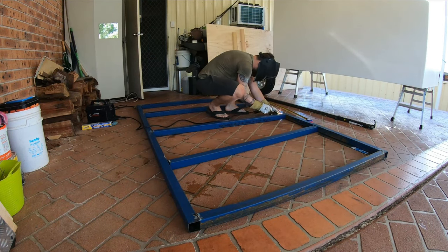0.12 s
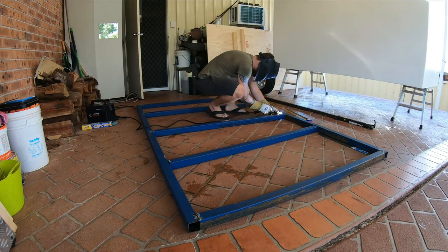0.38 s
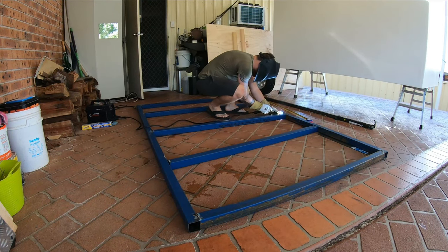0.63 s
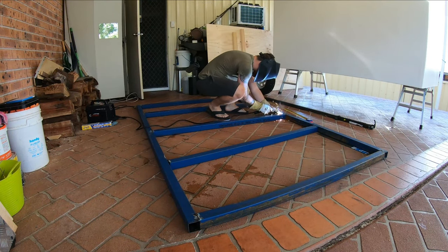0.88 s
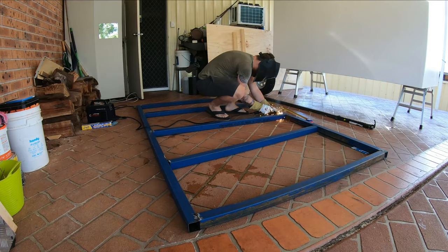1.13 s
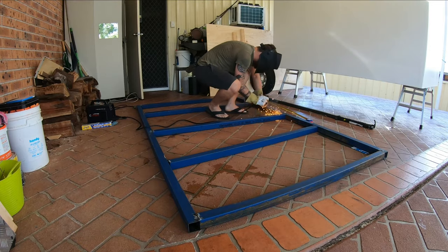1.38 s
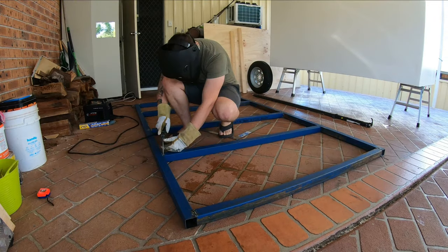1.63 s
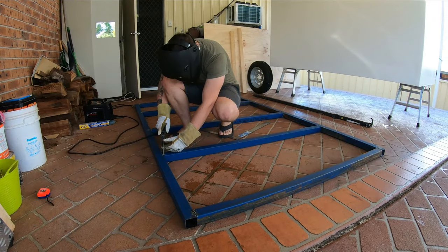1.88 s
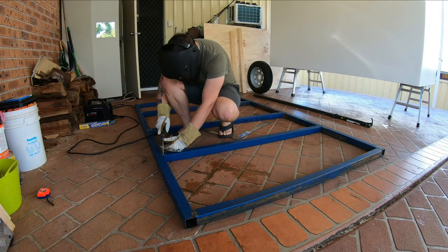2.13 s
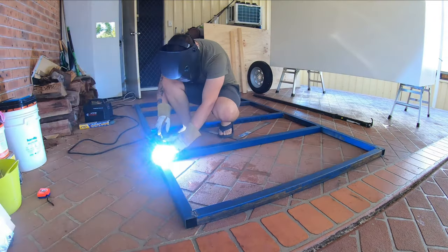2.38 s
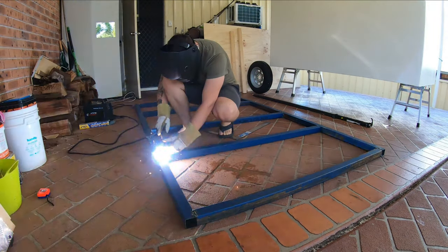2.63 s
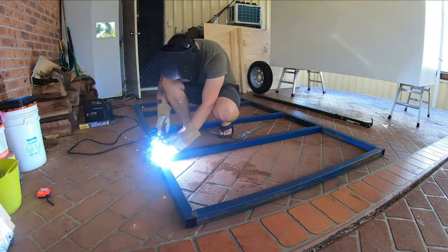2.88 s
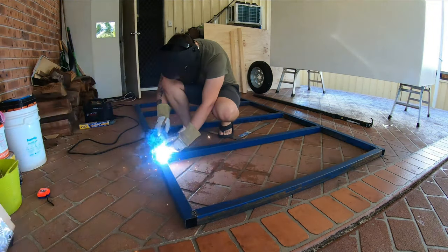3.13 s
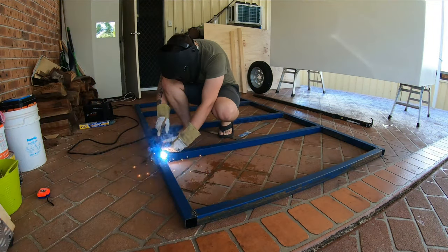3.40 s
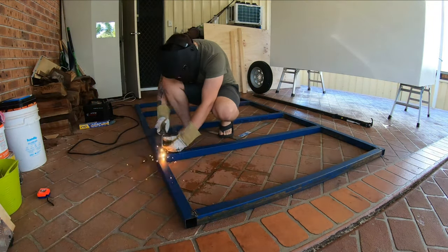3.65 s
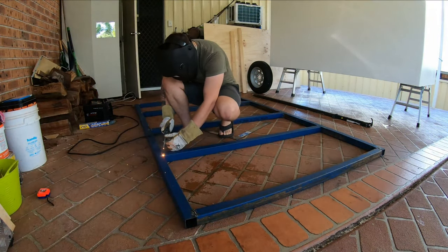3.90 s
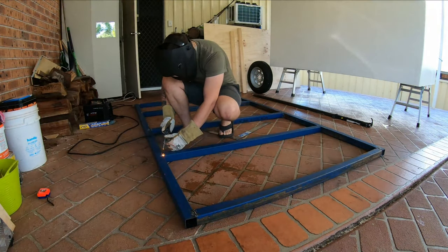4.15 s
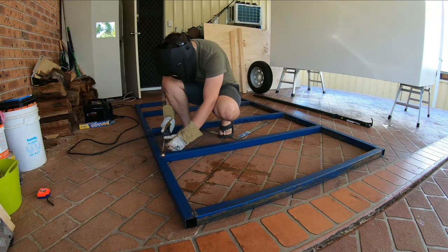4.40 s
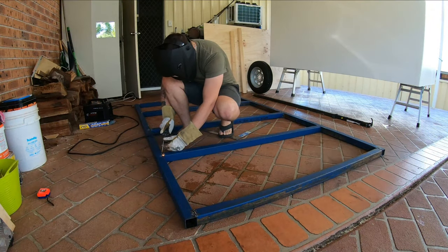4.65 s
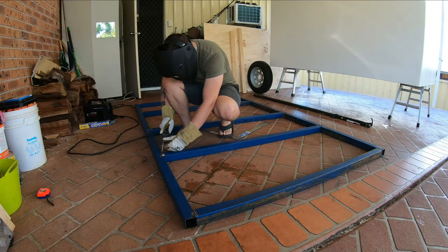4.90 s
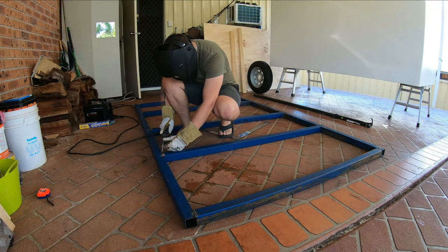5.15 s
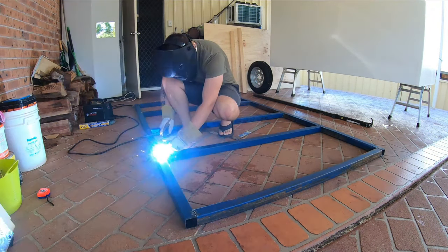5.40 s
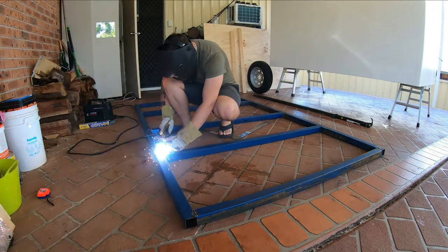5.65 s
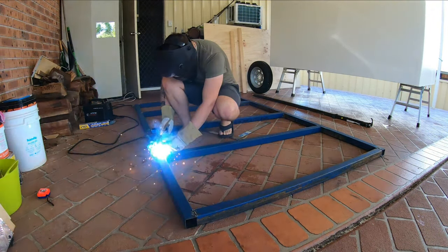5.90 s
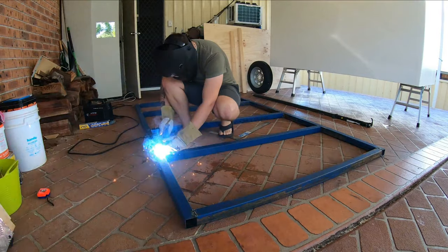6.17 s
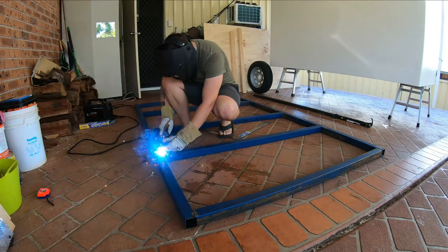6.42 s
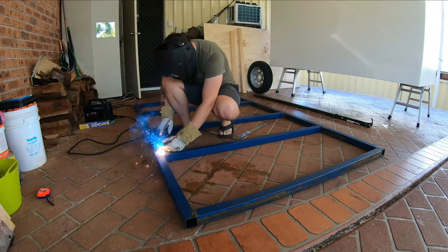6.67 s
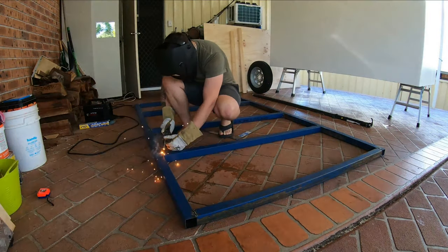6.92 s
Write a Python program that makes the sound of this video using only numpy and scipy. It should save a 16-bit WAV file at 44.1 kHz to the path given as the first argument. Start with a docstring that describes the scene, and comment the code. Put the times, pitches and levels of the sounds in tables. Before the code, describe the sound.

Harsh welding sizzle with spitting pops comes farther off, then twice close by, between pauses filled only by a fan's whirring mid-pitched hum.

```python
"""Under a carport, a stick welder joins steel tube: first at a far joint, then, after a jump in time,
twice at a near one. Random spark pulses make the sizzle, larger ones the pops; the two near runs
strike with a thud, low puffs of noise join in, and floor, walls and a tail answer.
The machine's seven-bladed fan hums throughout as tones over rushing noise; low noise stirs at the
microphone, with a thin hiss, a faint click at the jump, rustles and a bump."""
import sys
import numpy as np
from scipy import signal
from scipy.fft import rfft, irfft, next_fast_len
from scipy.io import wavfile
from scipy.ndimage import map_coordinates

SR = 44100
rng = np.random.default_rng(int(sys.argv[2]) if len(sys.argv) > 2 else 0)


def unload_audio(sound):
    """Save the sound as a 16-bit wav file, at the path given as the first command line argument."""
    columns = np.transpose(np.atleast_2d(sound))
    # keep every value between -1 and 1, then stretch to whole-number steps
    steps = np.round(np.clip(columns, -1, 1) * 32767)
    wavfile.write(sys.argv[1], SR, steps.astype(np.int16))


def gain_from_decibels(decibels):
    """Convert decibel values to linear amplitude factors."""
    exponent = np.asarray(decibels, float) / 20
    return 10 ** exponent


N = 310464
JUMP = 1.64  # s, from the far joint to the near one

# The burning arc, before its flares and the floor's colour. Each row: lit in seconds, broken in seconds,
# sizzle at first in dB, sizzle at last in dB, flare as it breaks in dB.
RUNS = [(0, 1.327, -44.5, -41.5, 5.5), (2.432, 3.765, -40, -43, 9.5), (5.377, 6.894, -40, -46, 18)]


def unit(x):
    """Brought to rms 1."""
    return x / np.sqrt(np.mean(x ** 2) + 1e-20)


def along(points, hz):
    """Reads (Hz, value) points on a log frequency axis."""
    point_hz, value = np.transpose(points)
    return np.interp(np.log(hz + 1), np.log(point_hz + 1), value)


def curves(rows):
    """One value per sample for each column after the time."""
    s, *columns = np.transpose(rows)
    return [np.interp(np.arange(N) / SR, s, column) for column in columns]


def wobble(rate):
    """A smooth random curve, rate knots a second."""
    knots = rng.standard_normal(int(N * rate / SR) + 4)
    return map_coordinates(knots, [np.arange(N) * rate / SR])


def filtered(x, response):
    """x times a complex response of frequency."""
    m = next_fast_len(N + SR // 2)
    return irfft(rfft(x, m) * response(np.fft.rfftfreq(m, 1 / SR)), m)[..., :N]


def pulse(gain, size=2048):
    """The shortest causal (minimum-phase) pulse of a given colour, peak 1."""
    cepstrum = irfft(np.log(gain(np.fft.rfftfreq(size, 1 / SR)) + 1e-6))
    # folding the cepstrum forward in time makes the pulse causal
    cepstrum[1:size // 2] *= 2
    cepstrum[size // 2 + 1:] = 0
    p = irfft(np.exp(rfft(cepstrum)))
    return p / np.abs(p).max()


def diffuse(pair, alike):
    """Two unrelated signals mixed to a left-right likeness at each frequency."""
    turn = lambda hz: np.arccos(np.clip(along(alike, hz), -1, 1)) / 2
    mid, side = filtered(pair, lambda hz: [np.cos(turn(hz)), np.sin(turn(hz))])
    return np.array([mid + side, mid - side])


def bump(s, rise, fall):
    """Grows exponentially to 1 at s, then dies away."""
    t = np.arange(N) / SR - s
    return np.exp(np.where(t < 0, t / rise, -t / fall))


def peak_shape(hz, centre_hz, width_hz):
    """A resonance curve, 1 at its centre."""
    return width_hz ** 2 / (width_hz ** 2 + 4 * (hz - centre_hz) ** 2)


def swells(rows, octaves):
    """Short swells of band noise, rows of (s, dB, half width s, Hz)."""
    t, out = np.arange(N) / SR, np.zeros(N)
    for s, db, width, centre_hz in rows:
        band_gain = lambda hz: np.exp(-(np.log2((hz + 1) / centre_hz) / octaves) ** 2)
        band = filtered(rng.standard_normal(N), band_gain)
        out += gain_from_decibels(db) * np.exp(-((t - s) / width) ** 2) * unit(band)
    return out


def draught():
    """Air at the microphone: a lumpy rumble, partly each port's own, swelling in gusts."""
    # Each row: peak in seconds, level in dB, half width in seconds.
    gust_rows = [(2.43, -65, 0.027), (2.78, -72, .04), (3.02, -75, 0.027), (3.78, -62, .04),
                 (5.39, -53, .05), (5.76, -60, 0.041), (6.21, -53, .03), (6.57, -56.5, 0.087),
                 (6.92, -77, .04)]
    t = np.arange(N) / SR
    noise = rng.standard_normal(N) + 0.71 * rng.standard_normal((2, N))
    rumble_colour = [(12, -39), (30, -9.0), (60, 0.0), (90, -13.0), (200, -57)]  # Hz, dB
    rumble = filtered(noise, lambda hz: gain_from_decibels(along(rumble_colour, hz)))
    gusts = sum(gain_from_decibels(db) * np.exp(-((t - s) / width) ** 2) for s, db, width in gust_rows)
    still_db = np.where(t < JUMP, -75, -82)
    return (gain_from_decibels(still_db + 2.5 * wobble(7.4)) + gusts) * unit(rumble)


def hiss():
    """A thin hiss high in the treble, each port its own; its level follows a short curve."""
    # Each row: time in seconds, level in dB.
    hiss_level = [(0, -80), (1.5, -74), (2.4, -77), (4.05, -78), (4.15, -99), (7.04, -93)]
    treble = lambda hz: np.exp(-(np.log2((hz + 1) / 9500) / 0.41) ** 2)
    return gain_from_decibels(curves(hiss_level)[0]) * unit(filtered(rng.standard_normal((2, N)), treble))


def click_and_rustles():
    """A faint click at the jump in time, then rustles and a bump, as short swells of band noise."""
    # Each row: peak in seconds, level in dB, half width in seconds, centre in Hz.
    rustle_rows = [(1.639, -64, 0.00091, 12000), (2.097, -63, .006, 7800), (2.16, -56.5, 0.05, 3104),
                   (4.52, -60, 0.012, 90)]
    return swells(rustle_rows, octaves=.6)


def fan():
    """The blade tone and weak shaft orders waver over the rush of air through the case."""
    # Each row: time in seconds, blade pitch in Hz, blade tone in dB.
    blade_course = [(0, 453.3, -45.5), (1, 455.7, -48.5), (1.62, 454.5, -44), (1.66, 461.3, -48.5),
                    (2.3, 464.4, -51.5), (3, 459.3, -50.5), (4.2, 455.5, -47.5), (4.5, 456.7, -51),
                    (5.29, 455.4, -44), (6.2, 458.8, -49), (7.04, 453.4, -45)]
    # Each row: order of the shaft's turning rate, level in dB.
    shaft_orders = [(5, -61), (8, -57), (12, -67), (14, -66), (20, -65), (24, -74), (28, -74), (35, -77),
                    (46, -73)]
    # The rush of air ahead of the case. Each row: frequency in Hz, relative dB per Hz.
    air_colour = [(35, -69), (60, -51), (269, -15.5), (302, -10.5), (381, -13), (458, -5), (491, -14.5),
                  (526, -12), (679, -13.5), (916, -15.5), (1130, -19.5), (1270, -18.5), (2910, -26),
                  (7680, -37), (15000, -73)]
    # The machine's case. Each row: resonance in Hz, width in Hz, its share in dB relative to the plain air.
    case_peaks = [(311, 57, -2.5), (163.5, 39, 12.5), (940, 31, 0)]
    # Each row: time in seconds, level of the air in dB.
    air_level = [(0, -48.5), (1.63, -47.5), (1.65, -46), (3.5, -47), (5, -47.5), (7.04, -46.5)]
    # Diffuse air at the two ports. Each row: frequency in Hz, left-right likeness from 0 to 1.
    air_likeness = [(60, 0.27), (130, 0.78), (290, 0.99), (640, 0.33), (1410, 0.16), (3100, 0.8),
                    (6820, 0.11), (15000, 0.065)]
    blades = 7
    blade_hz, blade_db = curves(blade_course)
    turn = 2 * np.pi * np.cumsum(blade_hz * (1 + 0.001184 * wobble(12))) / SR / blades  # shaft, radians
    blade = gain_from_decibels(blade_db + 1.55 * wobble(25) + 0.9 * wobble(7)) * np.sin(blades * turn)
    orders = sum(gain_from_decibels(db + 3.0 * wobble(6)) * np.sin(order * turn + 0.7 * wobble(9.8))
                 for order, db in shaft_orders)
    tone = np.sqrt(2) * (blade + orders) * gain_from_decibels([[.3], [-.3]])  # a shade to the left
    case = lambda hz: 1 + sum(gain_from_decibels(db) * peak_shape(hz, centre, width) for centre, width, db in case_peaks)
    air = filtered(rng.standard_normal((2, N)), lambda hz: gain_from_decibels(along(air_colour, hz)) * case(hz))
    air_db = curves(air_level)[0] + .8 * wobble(6)
    return tone + gain_from_decibels(air_db) * unit(diffuse(air, air_likeness))


def puffs():
    """The arc stretches and gutters with low puffs, as swells of band noise."""
    # Each row: peak in seconds, level in dB, half width in seconds, centre in Hz.
    puff_rows = [(1.335, -50.5, 0.025, 167), (2.45, -38, 0.025, 170), (2.77, -61, 0.015, 120),
                 (3.03, -50, 0.0095, 143), (3.78, -37, 0.013, 155), (5.4, -37, 0.022, 168),
                 (5.52, -51, 0.085, 178), (6.906, -36, 0.029, 193), (6.92, -42, 0.022, 100)]
    return swells(puff_rows, octaves=0.52)


def strikes():
    """Cold air flashes to plasma: one big dull pulse as each near run lights."""
    # Each row: start in seconds, peak in dB.
    strike_rows = [(2.429, -4), (5.3774, -4)]
    # Colour of the thud. Each row: frequency in Hz, relative dB per Hz.
    thud_colour = [(47, -31), (80, -12.5), (405, 1.5), (1420, 1.5), (1760, 1.5), (2590, -30), (3290, -10),
                   (4080, -5), (6030, -16.5), (8160, -23), (10300, -19), (12000, -47), (14000, -40)]
    s, db = np.transpose(strike_rows)
    blows = np.bincount(np.round(s * SR).astype(int), -gain_from_decibels(db), N)
    return signal.oaconvolve(blows, pulse(lambda hz: gain_from_decibels(along(thud_colour, hz))))[:N]


def spark_parts():
    """A spark's pulse in three parts: body of the slow discharge, crack, and fizz of the fastest edge."""
    # Colour of a spark. Each row: frequency in Hz, relative dB per Hz.
    spark_colour = [(290, -22.5), (500, -9), (603, -5), (716, -10.5), (941, -7), (1170, -4), (1370, -5),
                    (1490, -4), (2040, -0.5), (2330, -5), (2970, -2), (6180, -3), (10500, -15),
                    (14000, -26), (15500, -21.5)]
    above = lambda hz, edge_hz: 1 / (1 + (edge_hz / (hz + 1)) ** 6)
    colour = lambda hz: gain_from_decibels(along(spark_colour, hz))
    body = pulse(lambda hz: colour(hz) * (1 - above(hz, 3050)))
    crack = pulse(lambda hz: colour(hz) * above(hz, 2930) * (1 - above(hz, 7840)))
    fizz = pulse(lambda hz: colour(hz) * above(hz, 6950))
    return body, crack, fizz


def small_pops(count=70):
    """Lesser pops scattered at random through each run, as rows like those of the loud ones."""
    # One row a run: pops per second, crack peak in dB.
    lesser_rates = [(25, -35.5), (25, -33), (28, -31.5)]
    body_db, fizz_db = -4.5, 6.5  # relative to the crack
    spread_db = [0, 2, 2]  # random spread of crack, body and fizz
    rows = []
    for (lit, broken, *_), (rate, crack_db) in zip(RUNS, lesser_rates):
        s = lit + np.cumsum(rng.exponential(size=count)) / rate
        levels = [crack_db, body_db, fizz_db] + rng.standard_normal((count, 3)) * spread_db
        rows += list(np.c_[s, levels][s < broken])
    return rows


def pops(delay=0.001185):
    """Molten drops short the arc and burst: single spark pulses, delay seconds after their listed times."""
    # The loudest sparks, before the floor's colour. Each row: time in seconds, crack peak in dB,
    # body in dB and fizz in dB, both relative to the crack.
    loud_pops = [(0.083, -34, -6, 6), (0.2389, -28, -8, 14), (0.408, -44, -6, 15), (0.4778, -23, -11, 2),
                 (0.6564, -30, 4.5, 2), (0.727, -39, -6, 16), (1.0076, -26, -5.5, 0),
                 (1.3127, -21, -6, -14), (2.7023, -14.5, -20, -4), (2.7125, -22, 6, 10),
                 (2.805, -11, -8, 0), (2.9755, -24, 1.5, 0), (3.0133, -16, -3.5, -1), (3.073, -20, -5, -2),
                 (3.2555, -24, -1, -15), (3.4614, -27, -9.5, 2), (3.5146, -32, 8, 4),
                 (3.5392, -15.5, -7.5, -3), (3.554, -21.5, 2, 0), (3.624, -30, 9, -5), (5.477, -20, -1, 1),
                 (5.4896, -22, -7, 1), (5.4996, -27, 2, -10), (5.7597, -23.5, 2.5, 3.5),
                 (5.7873, -17.5, -4.5, 0), (5.901, -24.5, 4, -5), (6.037, -27.5, -11, 10),
                 (6.0489, -23.5, 1.5, 8), (6.0758, -21, -12, 6), (6.1038, -22, -1, 8), (6.2845, -19, -7, 5),
                 (6.345, -21, -4, 5.5), (6.414, -21, -1.5, 0), (6.475, -28.5, -12, 8),
                 (6.5183, -28, -15, 1.5), (6.571, -21, -29, -12), (6.5979, -25.5, -10.5, 5),
                 (6.6096, -24, 0.5, 9.5), (6.6343, -18, -5.5, -2), (6.777, -16.5, -13, -3.5),
                 (6.8222, -18, -14, 3), (6.883, -26, 10, -10)]
    s, crack_db, body_db, fizz_db = np.transpose(loud_pops + small_pops())
    at = np.round((s + delay) * SR).astype(int)
    levels = (crack_db + body_db, crack_db, crack_db + fizz_db)
    return sum(signal.oaconvolve(np.bincount(at, -gain_from_decibels(level), N), part)[:N]
               for level, part in zip(levels, spark_parts()))


def burning():
    """Level and tilt of the arc in dB: a slow drift along each run, a strike, flares and a break."""
    # The arc flares as metal crosses it. Each row: peak in seconds, gain in dB, rise in seconds,
    # fall in seconds, tilt toward the body in dB.
    flare_rows = [(.045, 11, 0.043, 0.0078, 5.5), (0.124, 11.5, 0.012, 0.016, 3.5),
                  (.28, 10, 0.064, 0.013, 2), (.405, 7.5, .03, 0.0074, 1.5), (.48, 2, 0.0055, 0.013, -1),
                  (.58, 5.5, 0.016, 0.017, 1), (.658, 2, 0.0027, 0.023, 7), (.82, 0, .005, .04, 9),
                  (.94, 5, .02, 0.055, -1), (1.02, 1.5, 0.014, 0.45, 6), (2.704, 7.5, 0.0031, .05, -8),
                  (2.808, 6.5, 0.0061, 0.068, 0), (3.015, 5, 0.0045, 0.14, -2.5), (3.35, 1, .02, 0.056, -4),
                  (3.465, 5, 0.0046, 0.025, 0), (3.555, 2.5, 0.031, 0.01, -3),
                  (5.488, 12, 0.01, 0.056, 8.5), (5.692, 8, .005, 0.012, 1), (5.79, 9.5, 0.014, 0.032, -5),
                  (5.909, 7.5, 0.035, 0.014, 0.5), (6.05, 4, 0.041, 0.2, -7),
                  (6.212, 8.5, 0.012, 0.014, -4), (6.29, 9, 0.01, 0.024, -4),
                  (6.345, 8, 0.013, 0.021, -4.5), (6.42, 6, .005, 0.022, 0), (6.63, 11.5, 0.013, 0.031, -8),
                  (6.79, 5.5, 0.024, 0.033, -7), (6.84, 6, .02, 0.073, -3.5)]
    strike_db, strike_fall_s, strike_tilt_db = 7, .015, 10  # the fresh arc is loud and dull, then settles
    break_rise_s, break_tilt_db = 0.02, 5  # the stretched arc swells and dulls
    out_db_per_s = 454  # then dies
    t, level_db, tilt_db = np.arange(N) / SR, np.full(N, -200.), np.zeros(N)
    for lit, broken, first_db, last_db, break_db in RUNS:
        fresh = (lit > 0) * np.exp(-np.abs(t - lit) / strike_fall_s)  # the first run is already alight
        stretched = np.exp(np.minimum(t - broken, 0) / break_rise_s) * (t < broken + .1)
        drift_db = np.interp(t, [lit, broken], [first_db, last_db])
        dying_db = out_db_per_s * np.maximum(t - broken, 0)
        run_db = drift_db + strike_db * fresh + break_db * stretched - dying_db
        level_db = np.where(t >= lit, run_db, level_db)
        tilt_db += strike_tilt_db * fresh + break_tilt_db * stretched
    for s, db, rise, fall, lean_db in flare_rows:
        shape = bump(s, rise, fall)
        level_db += db * shape
        tilt_db += lean_db * shape
    return level_db, tilt_db


def sizzle(rate=2500, spread_db=4.5, own_db=3, flicker_db=1.2):
    """Dense random sparks, mostly tiny, a few large, each with its own colour; the arc flickers fast."""
    # How long the arc is drawn shifts its colour along each run, before the tilt of strikes, flares and
    # breaks. Each row: time in seconds, body in dB and fizz in dB, both relative to the crack.
    colour_drift = [(0, -2, 6.5), (1.336, -3, 4), (2.43, 1.5, -2.5), (3.766, -1.5, -2.5), (5.378, -3, 0.5),
                    (6.898, 2.5, -5.5)]
    size = np.minimum(rng.exponential(size=N), 3.2)
    sparks = -gain_from_decibels(spread_db * size) * (rng.random(N) < rate / SR)  # rate in sparks a second
    # each part of each spark has its own random level
    body, crack, fizz = (unit(signal.oaconvolve(sparks * gain_from_decibels(own_db * rng.standard_normal(N)), part)[:N])
                         for part in spark_parts())
    level_db, tilt_db = burning()
    body_db, fizz_db = curves(colour_drift)
    body_db = body_db + tilt_db
    fizz_db = fizz_db - 0.31 * tilt_db  # dB of fizz lost for each dB of tilt
    mix = crack + gain_from_decibels(body_db) * body + gain_from_decibels(fizz_db) * fizz
    mix = mix / np.sqrt(1 + gain_from_decibels(2 * body_db) + gain_from_decibels(2 * fizz_db))
    return mix * gain_from_decibels(level_db + flicker_db * wobble(40))


def floor_bounce(x):
    """Each run has its own colour, as bounces off the floor boost or cut bands."""
    # One table a run. Each row: centre of the band in Hz, width in Hz, boost or cut in dB.
    bounce_bands = [
        [(1224, 850, 8), (2900, 1800, 5), (3700, 420, 5), (4940, 300, 4.5), (5900, 500, -1.5),
         (11100, 550, 2.5)],
        [(2420, 800, 0.5), (4688, 1100, 3), (12000, 930, -3)],
        [(2150, 410, 1.5), (2820, 340, 5), (4600, 480, -2), (10400, 650, 3)],
    ]
    t, out = np.arange(N) / SR, np.zeros(N)
    for (lit, broken, *_), bands in zip(RUNS, bounce_bands):
        gain_db = lambda hz: sum(db * peak_shape(hz, centre, width) for centre, width, db in bands)
        colour = pulse(lambda hz: gain_from_decibels(gain_db(hz)))
        out += signal.oaconvolve(x * (t >= lit) * (t < broken + .1), colour)[:N]
    return out


def carport(x, walls, tail_db):
    """Direct sound reaches the ports out of step; single walls answer, then a tail dying band by band."""
    # The tail under the roof. Each row: frequency in Hz, time to fall 60 dB in seconds,
    # colour in dB added to tail_db, left-right likeness from 0 to 1.
    tail_bands = [(120, 0.5, -22.5, 0.93), (298, 0.088, 11, 1), (950, 0.37, -1.5, 0.27),
                  (3800, 0.31, -1, 0.67), (12000, 0.22, -2.5, 0)]
    # Direct sound at the two ports. Each row: frequency in Hz, radians by which the left leads.
    port_lead = [(150, 0), (400, -0.78), (1000, 0.84), (4000, -0.14), (6000, 0.88), (9000, 2.23),
                 (12000, 1.35)]
    side = np.array([[.5], [-.5]])
    direct = filtered(x, lambda hz: np.exp(1j * side * along(port_lead, hz)))
    # each echo's delay is scattered by a small random amount between the ports, one amount per wall
    echoes = lambda hz: sum(
        gain_from_decibels(db + side * pan_db) * np.exp(-2j * np.pi * hz * (s + side * rng.normal(0, 6e-5)))
        for s, db, pan_db in walls)
    band_hz, t60, colour_db, alike = np.transpose(tail_bands)
    by_band = lambda column: np.transpose([band_hz, column])
    hz, t, z = signal.stft(rng.standard_normal((2, SR // 2)), SR, nperseg=256)
    decay = gain_from_decibels(-60 * t / along(by_band(t60), hz)[:, None])
    tail = signal.istft(z * decay, SR, nperseg=256)[1]
    tail *= 1 - np.exp(-np.arange(tail.shape[1]) / (.006 * SR))  # the tail builds up
    wet = signal.fftconvolve(x[None], tail / np.linalg.norm(tail[0]), axes=1)[:, :N]
    wet = filtered(wet, lambda hz: gain_from_decibels(tail_db + along(by_band(colour_db), hz)))
    return direct + filtered(x, echoes) + diffuse(wet, by_band(alike))


def scene():
    """The same arc heard from two joints, over the fan."""
    # Echoes at each distance. Each row: delay in seconds, level in dB, left-right difference in dB.
    far_walls = [(.0014, -13.5, -19), (.0048, -18.5, -13), (.0075, -6.5, -4.5), (0.0107, -8, 7.5)]
    near_walls = [(.0009, -11, 0), (.002, -13, 0), (.0087, -8.5, -2), (.0093, -14, -1), (.0136, -15, 1)]
    arc = floor_bounce(sizzle() + pops()) + strikes() + puffs()
    far = np.arange(N) < JUMP * SR
    # the far joint's tail is cut off at the jump
    welding = carport(arc * far, far_walls, 1.5) * far + carport(arc * ~far, near_walls, -1.8)
    return welding + fan() + draught() + hiss() + click_and_rustles()


def band_limit(x):
    """A steep low-pass at the top of the band."""
    return signal.sosfilt(signal.butter(12, 16010, fs=SR, output="sos"), x)


def record(dry):
    """The microphone peaks near 10 kHz and its two ports differ a little."""
    # Each row: frequency in Hz, response in dB.
    mic_response = [(3, -40), (22, -0.5), (8800, 0.5), (10300, 1.5), (11000, -2), (14000, -2), (15800, -16)]
    # Each row: frequency in Hz, left over right in dB.
    port_balance = [(100, 1), (300, -0.4), (700, 2.5), (1500, 2.5), (6000, 0.5), (14000, 4)]
    side = np.array([[.5], [-.5]])
    ports = filtered(dry, lambda hz: gain_from_decibels(along(mic_response, hz) + side * along(port_balance, hz)))
    return band_limit(ports)


dry = scene()
out = record(dry)
unload_audio(out)
```